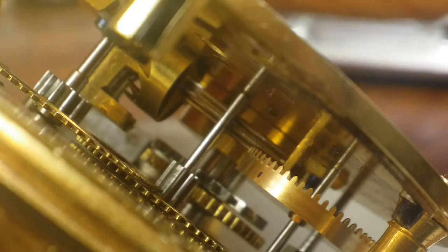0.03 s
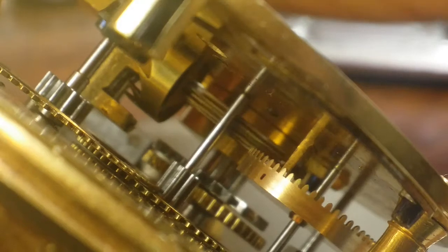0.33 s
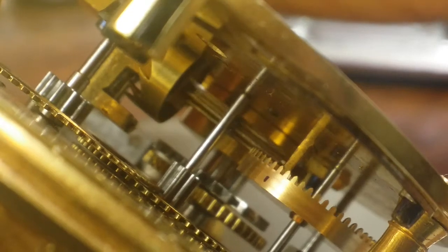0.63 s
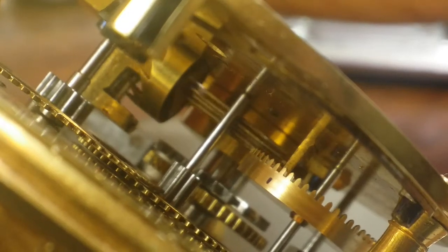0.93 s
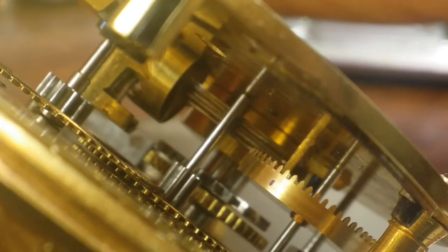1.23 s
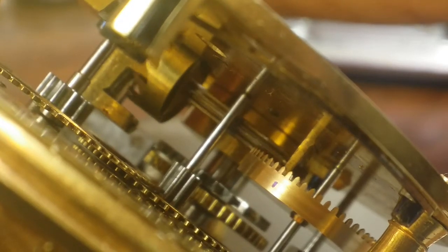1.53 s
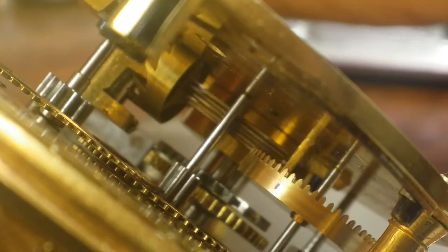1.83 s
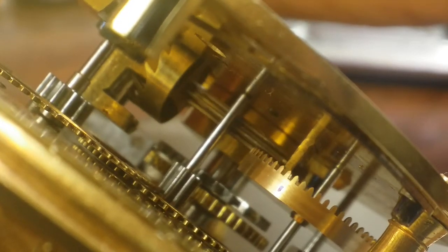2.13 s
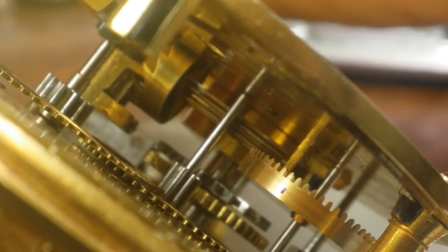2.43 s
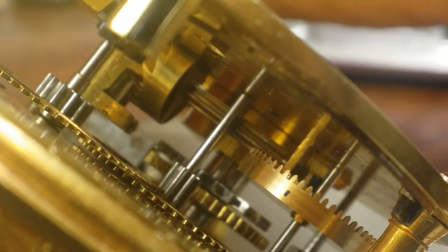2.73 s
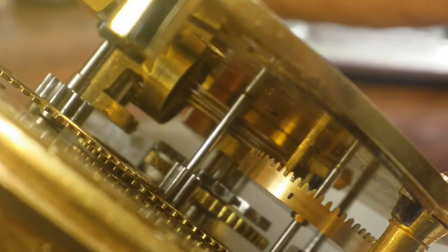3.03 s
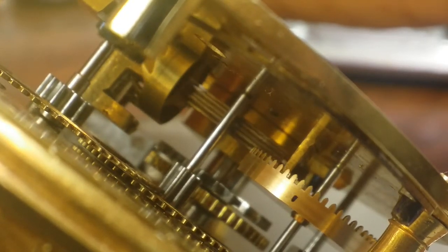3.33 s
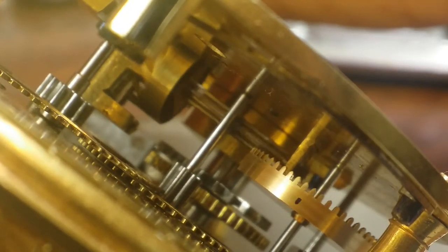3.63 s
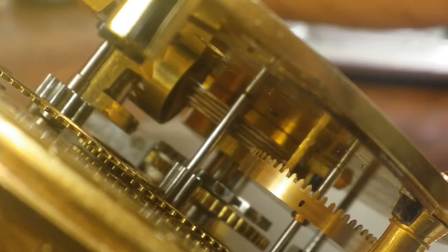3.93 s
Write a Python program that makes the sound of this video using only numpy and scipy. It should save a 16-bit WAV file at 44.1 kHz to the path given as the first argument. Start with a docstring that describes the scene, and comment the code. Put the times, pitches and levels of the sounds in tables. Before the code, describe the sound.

A mechanical watch ticks rapidly up close over a faint hum, with one pop.

```python
"""A workbench in a quiet room, where a brass watch movement ticks close by, about six times a second.
Each beat of the escapement is a short chatter of contacts that rings the plates; small steel parts
ring on, and a few faint rubs and gear-train scrapes fall among the beats. Behind the watch a motor hum
swells and fades over room rumble and microphone hiss. A voltage step pops the left channel once."""
import sys
import numpy as np
from scipy import signal
from scipy.fft import rfft, irfft
from scipy.io import wavfile

SR = 44100
rng = np.random.default_rng(int(sys.argv[2]) if len(sys.argv) > 2 else 0)


def unload_audio(sound):
    """Save the sound as a 16-bit wav file, at the path given as the first command line argument."""
    columns = np.transpose(np.atleast_2d(sound))
    # keep every value between -1 and 1, then stretch to whole-number steps
    steps = np.round(np.clip(columns, -1, 1) * 32767)
    wavfile.write(sys.argv[1], SR, steps.astype(np.int16))


N = 176400
TIME = np.arange(N) / SR

# Beats of the escapement, dull and bright in turn. Each row: start in seconds, relative level in dB,
# chatter length in seconds, treble shelf in dB, body shelf in dB, left over right in dB.
BEATS = [(.2095,-53.5,.005,-5,-1,9), (.383,-32.5,0.0078,6,1.5,2.5), (0.5298,-32.5,0.0057,-13,-6.5,3.5),
         (0.6878,-33,0.0064,0.5,2,0), (0.8447,-36.5,0.0027,-21,14,1), (1.0161,-31.5,0.0044,9,-1,2.5),
         (1.1671,-32,0.008,-21,-8,1.5), (1.3255,-33.5,0.0056,3,-4,2), (1.4823,-30,0.0065,-8,-12,3),
         (1.65,-30,0.0042,11,0,1.5), (1.8059,-30,0.0066,-4,-7,2.5), (1.9658,-29.5,0.0064,10,-1,0.5),
         (2.121,-29,0.0066,-7,-3,0.5), (2.2854,-37,0.0089,1,-10,1.5), (2.4506,-36,0.0092,-6,-5,4),
         (2.609,-30.5,0.0068,10.5,-1,1.5), (2.7623,-30,0.0044,-12,-4,3), (2.9259,-30.5,0.0057,6,3.5,3),
         (3.0792,-31.5,0.0062,-13,-5,3), (3.244,-29,0.0044,5,-1,0.5), (3.3993,-30,0.0039,-15,-3,3),
         (3.5692,-32,0.0079,1,-6,-3), (3.7347,-33.5,0.0025,2,-3,3.5), (3.902,-30.5,0.0042,7,4,-1)]
# Stereo image of the rumble and rubs: centred lows, wide highs.
# Each row: frequency in Hz, left-right likeness from 0 to 1.
STEREO_LIKENESS = [(50, 0.89), (350, 0.95), (700, 0.71), (1300, 0.28), (3000, 0.3)]


def from_db(db):
    """Decibels to gain."""
    return 10 ** (np.asarray(db) / 20)


def unit_rms(x):
    """Scale to an rms of 1."""
    return x / np.sqrt(np.mean(x ** 2) + 1e-20)


def fader(points):
    """Gain over time through (seconds, dB) points."""
    return from_db(np.interp(TIME, *np.transpose(points)))


def pan(db):
    """Stereo gains that put the left this many dB above the right."""
    return from_db([[db / 2], [-db / 2]])


def shelf(x, db, hz, kind):
    """Boost or cut the "high" or "low" end."""
    return x + (from_db(db) - 1) * signal.sosfilt(signal.butter(1, hz, kind, fs=SR, output="sos"), x)


def per_bin(points):
    """Spread each column of a table over the spectrum, along a log frequency axis."""
    hz, *columns = np.transpose(points)
    bins = np.maximum(np.fft.rfftfreq(N, 1 / SR), 1)
    return np.array([np.interp(np.log(bins), np.log(hz), column) for column in columns])


def noise(colour, likeness=0):
    """Stereo noise of a given colour and left-right likeness, at an rms of 1."""
    white = rfft(rng.standard_normal((3, N)))
    stereo = np.sqrt(likeness) * white[0] + np.sqrt(1 - likeness) * white[1:]
    return unit_rms(irfft(stereo * from_db(per_bin(colour)), N))


def drift(rate_hz):
    """Slow random motion, at an rms of 1."""
    rolloff = 1 + (np.fft.rfftfreq(N, 1 / SR) / rate_hz) ** 2
    return unit_rms(irfft(rfft(rng.standard_normal(N)) / rolloff, N))


def hum(partials, waver=.23, waver_hz=1.33):
    """Centred tones from (Hz, dB) pairs, each wavering in strength and phase."""
    out = np.zeros(N)
    for hz, db in partials:
        tone = np.exp(2j * np.pi * (hz * TIME + rng.random()))
        wobble = 1 + waver * (drift(waver_hz) + 1j * drift(waver_hz))
        out += from_db(db) * np.real(tone * wobble)
    return np.sqrt(2) * out


def shaft_hum(shaft_hz=58.97):
    """The motor hums at harmonics of its shaft rate, swelling and fading."""
    # Shaft harmonics. Each row: multiple of the shaft rate, level in dB before the swell.
    harmonics = [(3, -54.5), (4, -59.5), (8, -68), (9, -74), (10, -71)]
    # The swell. Each row: time in seconds, gain in dB.
    swell = [(.12, -24), (.55, -11.5), (.78, -0.5), (1.15, 0.5), (1.65, 7.5), (2.0, -2), (2.75, -0.5),
             (2.95, -10.5), (4, -22)]
    return fader(swell) * hum([(multiple * shaft_hz, db) for multiple, db in harmonics])


def mains_hum():
    """Mains hum rises with the motor and eases off more gently."""
    # Tones of the hum. Each row: frequency in Hz, level in dB before the swell.
    partials = [(120.2, -53.5), (240.4, -67.5), (318, -61.5)]
    # The swell. Each row: time in seconds, gain in dB.
    swell = [(.12, -22), (.5, -4.5), (.75, 2.5), (1.6, 4.5), (2.2, 4), (2.85, 0), (3.2, -1), (4, -5.5)]
    return fader(swell) * hum(partials)


def room_rumble():
    """Low room noise lifts with the hum, a touch left of centre."""
    # Colour of the rumble. Each row: frequency in Hz, relative density in dB.
    colour = [(25, -34), (42, -19), (58, -2), (100, -3), (150, 0), (200, -4), (290, 0.87), (365, 1.5),
              (430, -9), (620, -10), (830, -21), (1300, -25), (2500, -28), (6000, -38), (15000, -50)]
    # Its rise and fall. Each row: time in seconds, level in dB.
    ride = [(.12, -55.5), (.5, -54.5), (.8, -48.5), (1.15, -49.5), (1.7, -48.5), (2.05, -50), (2.9, -50.5),
            (3.2, -52), (4, -51)]
    return pan(.7) * fader(ride) * noise(colour, per_bin(STEREO_LIKENESS))


def microphone_hiss():
    """Each microphone adds a bright hiss of its own."""
    # Colour of the hiss. Each row: frequency in Hz, relative density in dB on the left, then the right.
    colour = [(507, -8.5, -9), (2700, -2.5, -6), (5200, 3.5, 0), (5650, 7, -10), (6850, 13.5, -1),
              (8300, -0.5, -11.5), (8200, 5, 1), (11600, -0.5, -2.5), (14100, 2, -0.5),
              (15900, -45.5, -42.5)]
    # Its gentle rise and fall. Each row: time in seconds, level in dB.
    ride = [(.12, -65), (.5, -63), (.9, -61.5), (1.6, -60.5), (2.3, -62), (3.2, -62), (4, -61)]
    return fader(ride) * noise(colour)


def chatter(length_s, attack_s, release_s=.0076, contacts_per_s=8000, size=4096):
    """The escapement lands in a dense run of small contacts that holds, then dies away."""
    t = np.arange(size) / SR
    hits = (rng.random(size) < contacts_per_s / SR) * rng.choice([-1, 1], size)
    strength = from_db(4 * rng.standard_normal(size))
    hold_s = .83 * length_s
    envelope = np.minimum(t / attack_s, 1) * np.exp(-np.maximum(t - hold_s, 0) / release_s)
    return hits * strength * envelope


def force_on_mode(contacts, attack_s, wander_share=.35, first_blow=5.6):
    """A steady first blow, then contacts whose place wanders, so each mode feels them differently."""
    coupling = np.sqrt(1 - wander_share) + np.sqrt(wander_share) * rng.standard_normal(len(contacts))
    force = contacts * coupling
    force[int(attack_s * SR)] += first_blow
    return force


def resonate(x, hz, width_hz):
    """One resonance, with unity gain at its peak."""
    radius = np.exp(-np.pi * width_hz / SR)
    poles = [1, -2 * radius * np.cos(2 * np.pi * hz / SR), radius ** 2]
    return signal.lfilter(np.array([1, 0, -1]) * (1 - radius ** 2) / 2, poles, x + 1e-18)


def plate_ticks(attack_s=.0007, trim_db=-4.5, treble_hz=7400, body_hz=3000):
    """Every beat rings the plates; each microphone hears the modes in its own balance and polarity."""
    # Modes of the plates and case. Each row: frequency in Hz, bandwidth in Hz, left gain in dB,
    # right gain in dB, polarity on the right.
    modes = [(1650, 122, -27, -21, 1), (2505, 112, -14, -17, 1), (2820, 82, -9, -16, 1),
             (3160, 500, -21, -23, 1), (3740, 300, -7, -18, 1), (4080, 450, -11, -21, 1),
             (4680, 306, -9, -22, 1), (5277, 278, -10, -14, 1), (5630, 106, 5, -6, 1),
             (6165, 220, 1, -8, -1), (6655, 80, 1, -20, -1), (7010, 180, 0, -24, 1), (7690, 234, 0, -4, -1),
             (8190, 119, -30, -5, 1), (8880, 216, -13, -7, 1), (9680, 332, -26, -9, 1),
             (10480, 290, -23, -27, -1), (11390, 665, -22, -22, 1), (12390, 504, -26, -23, -1),
             (14340, 208, -18, -18, 1)]
    out = np.zeros((2, N + SR))
    for start_s, db, length_s, treble_db, body_db, pan_db in BEATS:
        contacts = chatter(length_s, attack_s)
        tick = np.zeros((2, len(contacts)))
        for k, (hz, width_hz, left_db, right_db, polarity) in enumerate(modes):
            pickup = np.array([[from_db(left_db)], [polarity * from_db(right_db)]])
            ring = resonate(force_on_mode(contacts, attack_s), hz, width_hz)
            tick += (-1) ** k * pickup * ring  # neighbouring modes alternate in sign
        tick = shelf(tick, treble_db, treble_hz, "high")
        tick = shelf(tick, body_db, body_hz, "low")
        tick *= np.sqrt(2 * length_s * SR / np.sum(tick ** 2))  # longer chatter carries more energy
        start = int(start_s * SR)
        out[:, start:start + len(contacts)] += from_db(db + trim_db) * pan(pan_db) * tick
    return out[:, :N]


def steel_ring(trim_db=-.5, spread_db=2):
    """Small steel parts ring on after each beat, with a new strength every time."""
    # Long rings of the steel. Each row: frequency in Hz, seconds to fall by 60 dB,
    # left gain in dB, right gain in dB.
    modes = [(3690, .3, -65, -77), (5690, .16, -58, -70), (6670, .2, -58, -74), (7090, .2, -61, -72),
             (10890, .2, -74, -74), (11310, .18, -71, -69)]
    start_s, beat_db = np.transpose(BEATS)[:2]
    strike_db = trim_db + beat_db - np.median(beat_db)
    out = np.zeros((2, N))
    for hz, t60_s, left_db, right_db in modes:
        scatter_db = spread_db * rng.standard_normal(len(BEATS))
        strikes = np.zeros(N)
        strikes[(start_s * SR).astype(int)] = from_db(strike_db + scatter_db)
        radius, angle = from_db(-60 / (t60_s * SR)), 2 * np.pi * hz / SR
        poles = [1, -2 * radius * np.cos(angle), radius ** 2]
        ring = signal.lfilter([0, np.sin(angle)], poles, strikes + 1e-18)
        out += from_db([[left_db], [right_db]]) * ring
    return out


def room_reverb(x, t60_s=.16, build_s=.008, wet_db=-14.5):
    """The room answers with a short diffuse tail, different on each side."""
    t = TIME[:SR // 2]
    envelope = np.minimum(t / build_s, 1) * from_db(-60 * t / t60_s)
    tail = unit_rms(rng.standard_normal((2, len(t))) * envelope) / np.sqrt(len(t))
    return from_db(wet_db) * signal.fftconvolve(x, tail, axes=1)[:, :N]


def soft_rubs():
    """Two dull rubs ease in and out, one running into the other."""
    # Bell-shaped swells. Each row: centre in seconds, width in seconds, peak level in dB.
    rubs = [(1.057, 0.019, -47), (1.13, 0.063, -51)]
    # Their low, hollow colour. Each row: frequency in Hz, relative density in dB.
    colour = [(200, -5), (320, 29.5), (450, 2.5), (1100, -4.5), (1900, -9), (3000, -13.5), (8000, -14)]
    envelope = sum(from_db(db) * np.exp(-.5 * ((TIME - centre_s) / width_s) ** 2)
                   for centre_s, width_s, db in rubs)
    return envelope * noise(colour, per_bin(STEREO_LIKENESS))


def gear_scrapes():
    """Brief, thin scrapes in the gear train start sharply and die away."""
    # The scrapes. Each row: start in seconds, level in dB, decay time in seconds.
    scrapes = [(1.243, -52, 0.0064), (1.412, -41, 0.0015), (1.420, -49, 0.0059), (1.440, -54.5, 0.045),
               (1.553, -54, 0.003), (1.6716, -31, 0.00061), (1.680, -58, 0.061), (2.173, -51.5, 0.01)]
    # Their bright colour. Each row: frequency in Hz, relative density in dB.
    colour = [(2000, -12), (5000, -6), (7500, 0), (9800, 6.5), (12000, 2.5), (15000, -18)]
    envelope = sum(from_db(db) * (TIME >= start_s) * np.exp(-np.abs(TIME - start_s) / decay_s)
                   for start_s, db, decay_s in scrapes)
    return envelope * noise(colour)


def voltage_pop(start_s=1.6903, step_db=-13, low_cut_hz=64, high_cut_hz=4270):
    """A voltage step in the left channel swings through the steep low cut of the input."""
    step = from_db(step_db) * (TIME >= start_s)
    swing = signal.sosfilt(signal.butter(6, low_cut_hz, "high", fs=SR, output="sos"), step)
    pop = signal.sosfilt(signal.butter(2, high_cut_hz, fs=SR, output="sos"), swing + 1e-18)
    return pop * np.array([[1], [0]])


def scene():
    """The watch in its room, over a bed of hum, rumble and hiss, with one pop."""
    watch = plate_ticks() + steel_ring() + gear_scrapes() + soft_rubs()
    bed = shaft_hum() + room_rumble() + mains_hum() + microphone_hiss()
    return watch + room_reverb(watch) + bed + voltage_pop()


def record(dry):
    """The sound opens after a moment of silence; the very top is cut steeply."""
    silence_s, fade_s, high_cut_hz = .118, .005, 14750
    opened = dry * np.clip((TIME - silence_s) / fade_s, 0, 1)
    return signal.sosfilt(signal.ellip(10, .2, 70, high_cut_hz, fs=SR, output="sos"), opened)


dry = scene()
out = record(dry)
unload_audio(out)
```